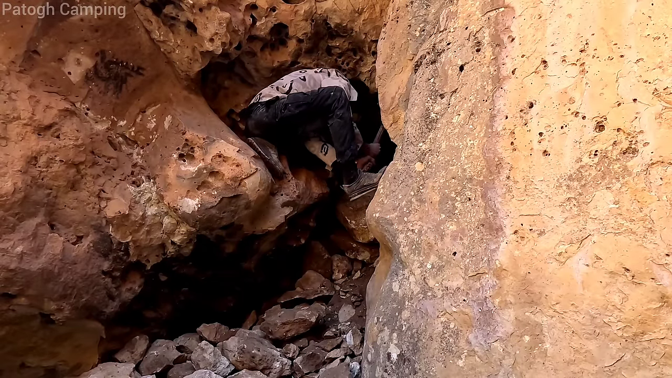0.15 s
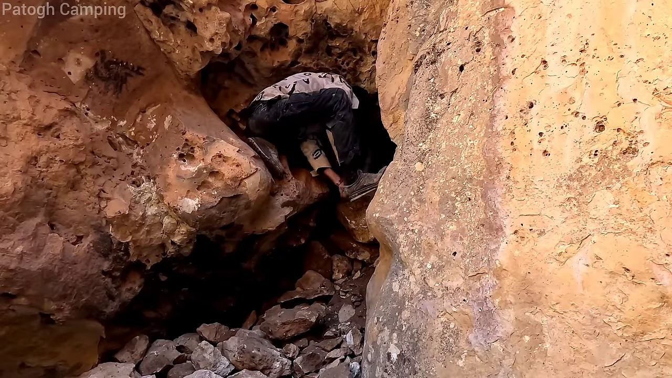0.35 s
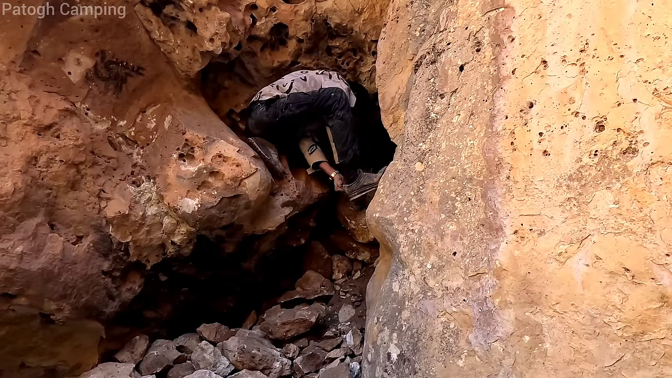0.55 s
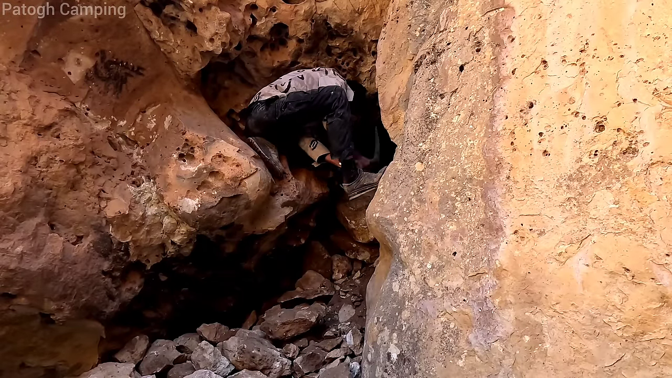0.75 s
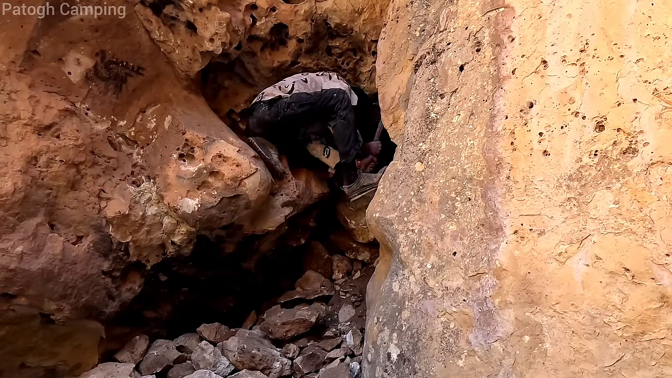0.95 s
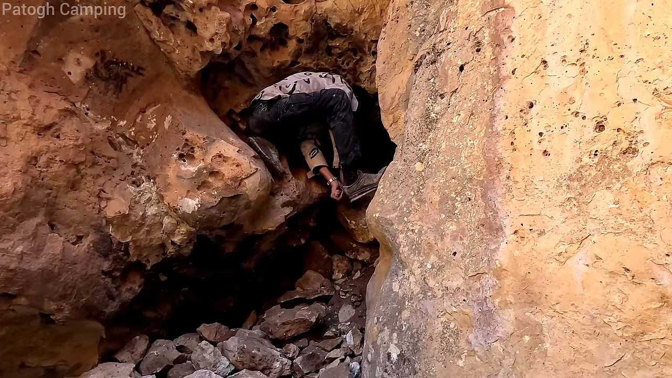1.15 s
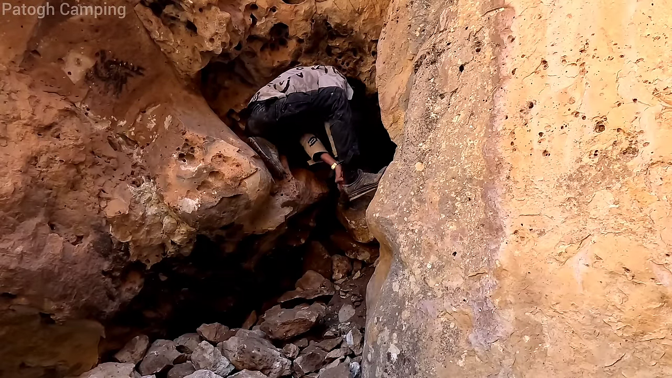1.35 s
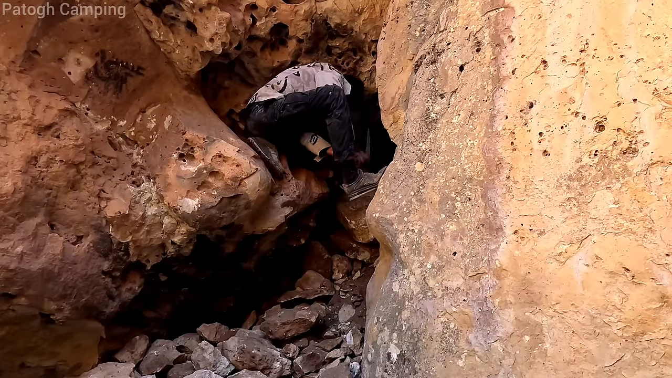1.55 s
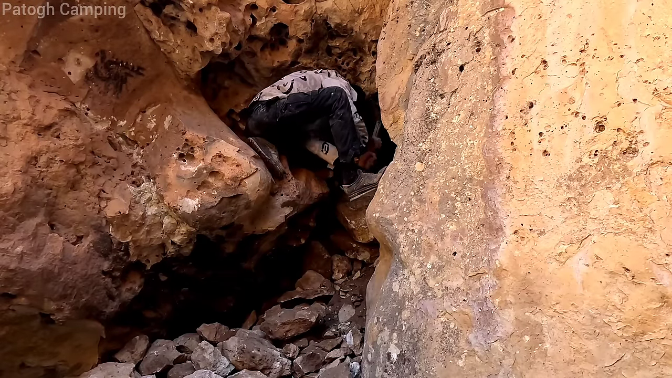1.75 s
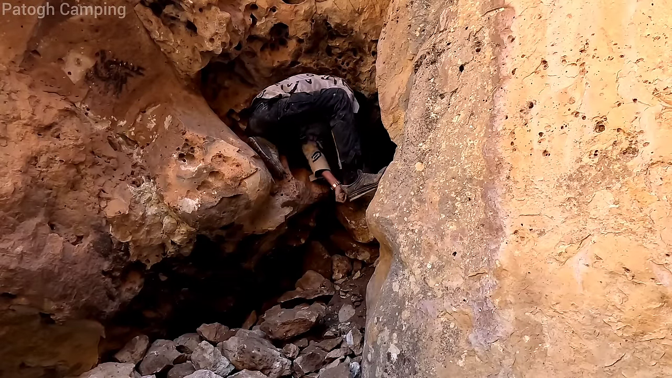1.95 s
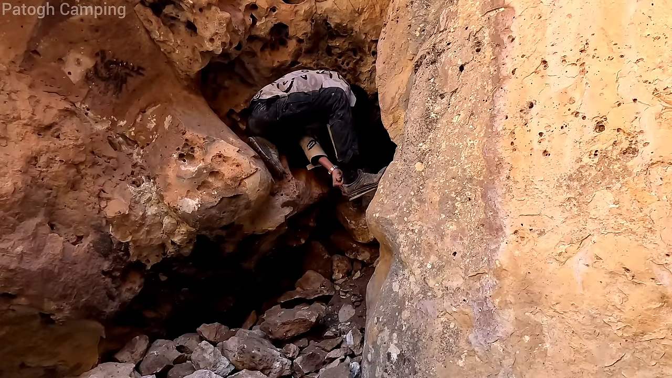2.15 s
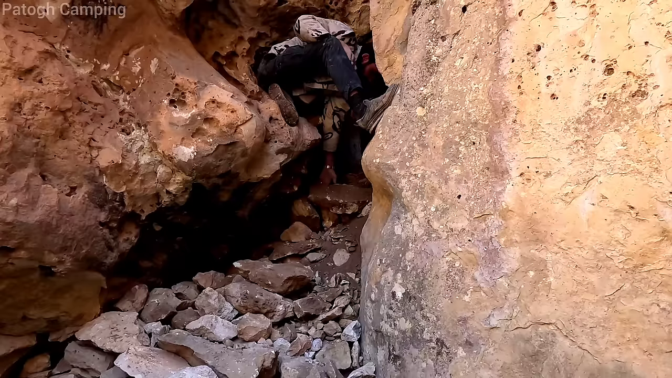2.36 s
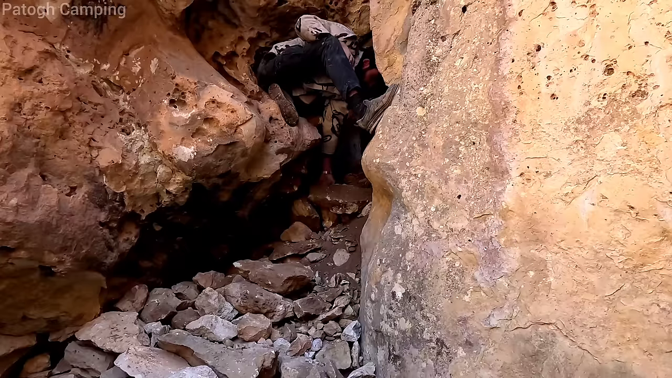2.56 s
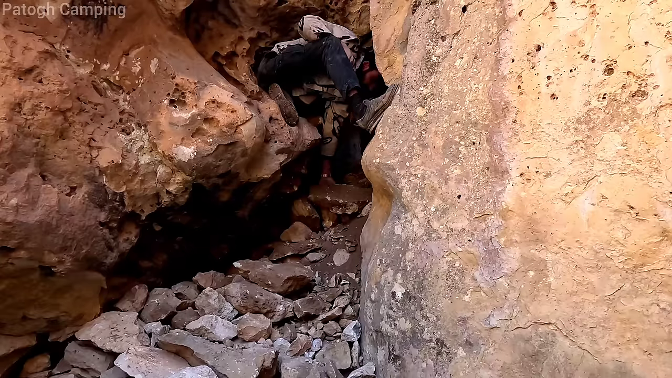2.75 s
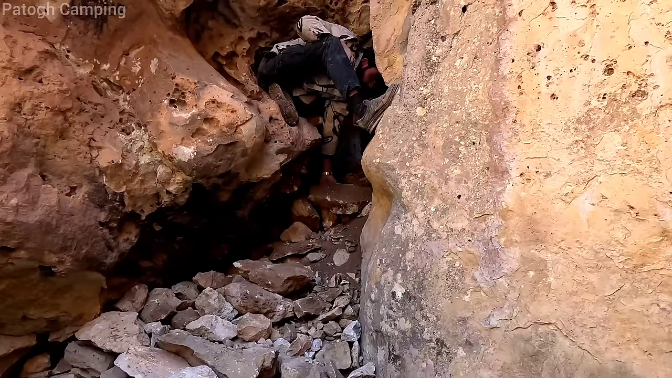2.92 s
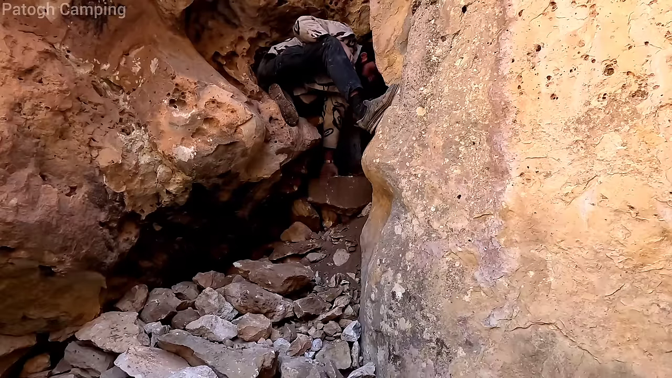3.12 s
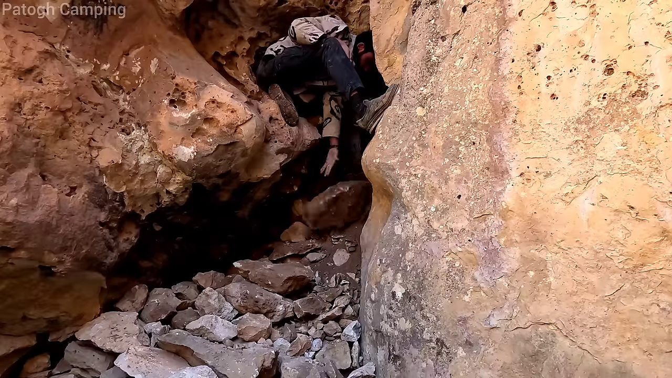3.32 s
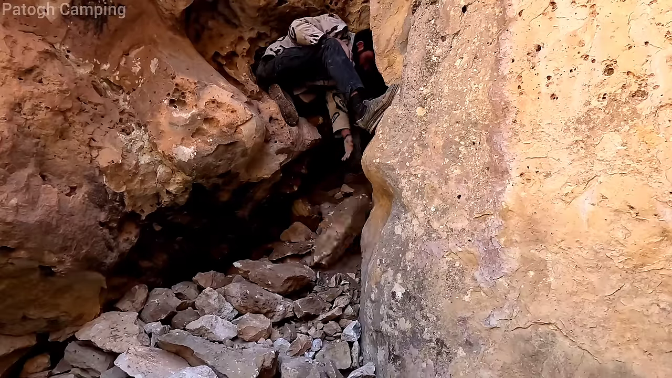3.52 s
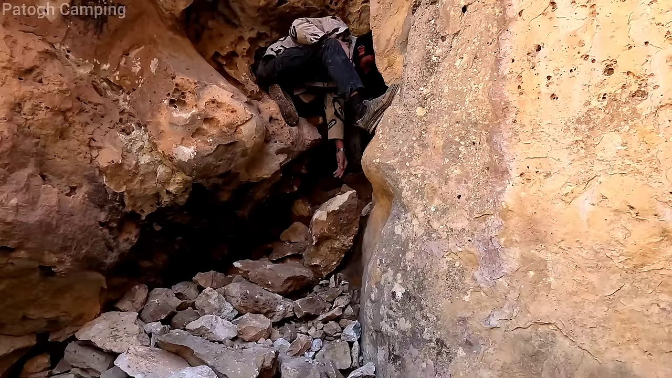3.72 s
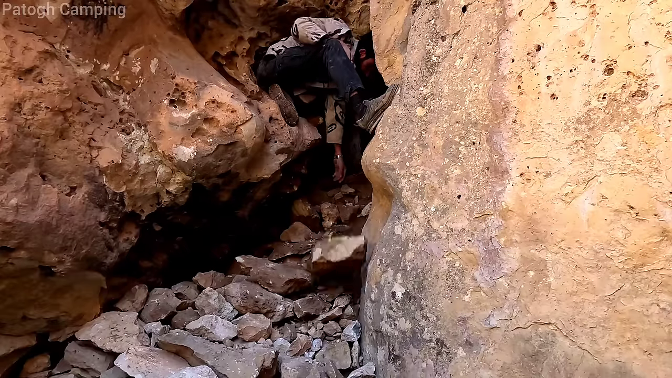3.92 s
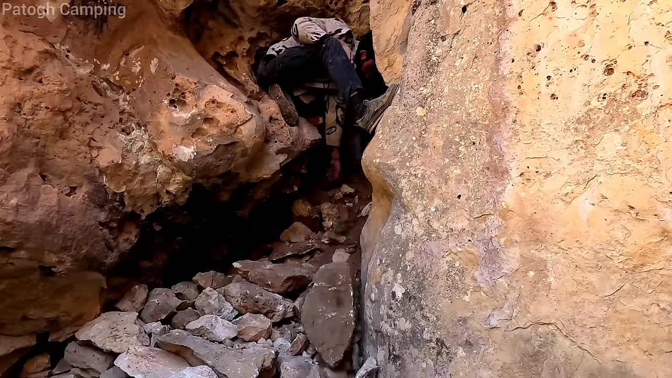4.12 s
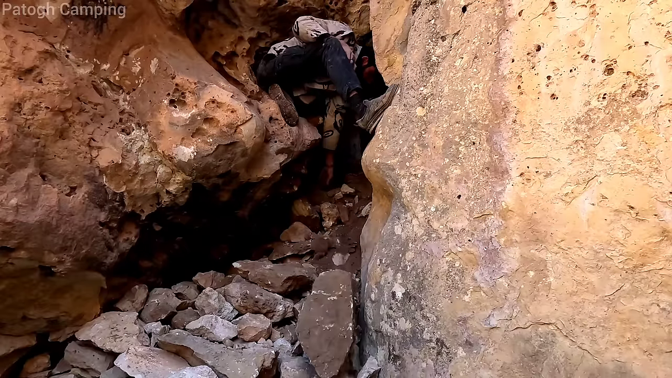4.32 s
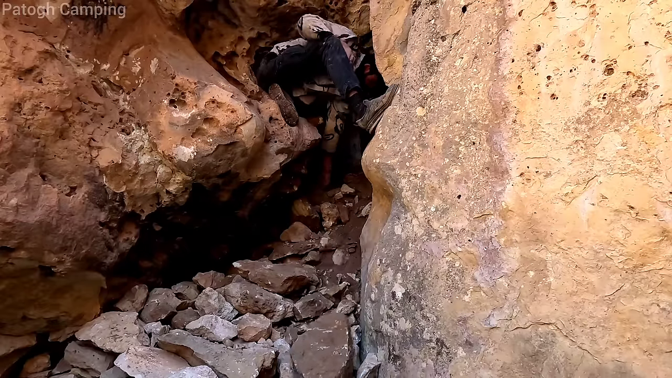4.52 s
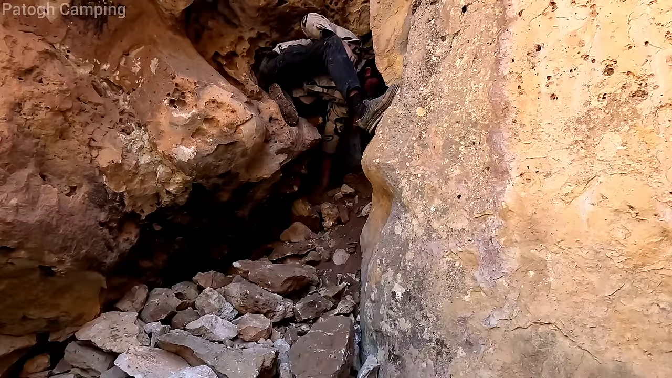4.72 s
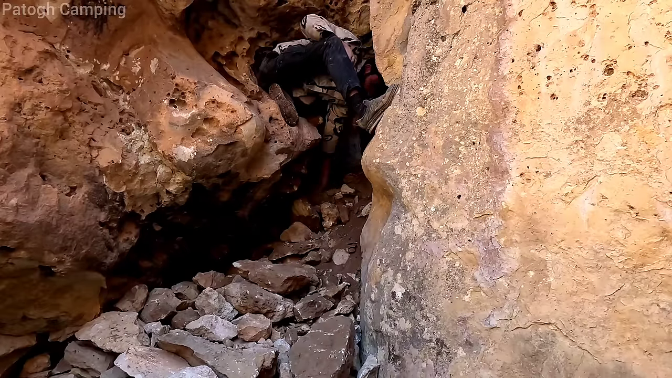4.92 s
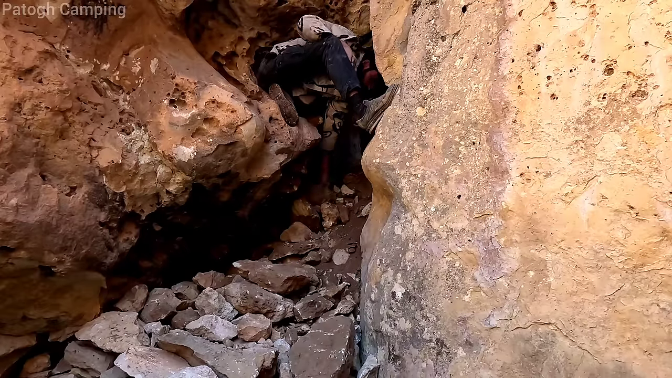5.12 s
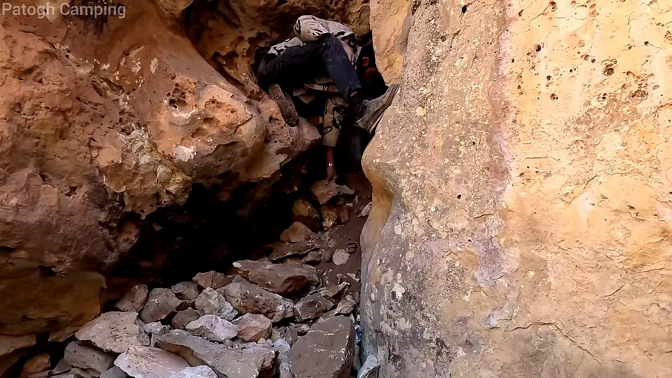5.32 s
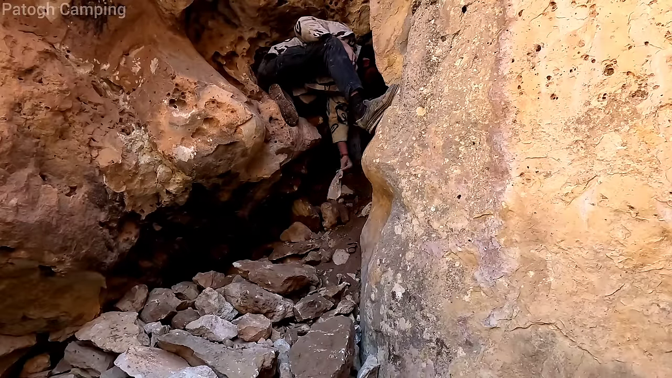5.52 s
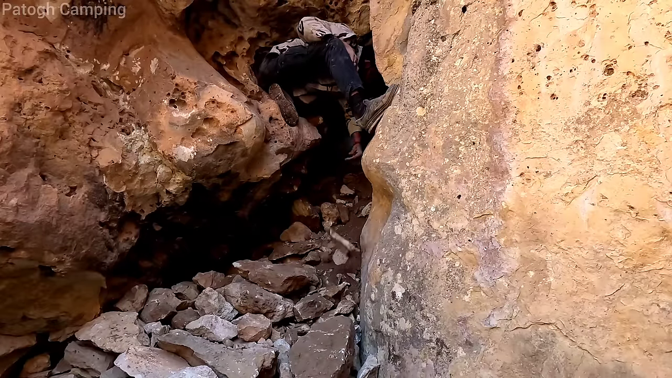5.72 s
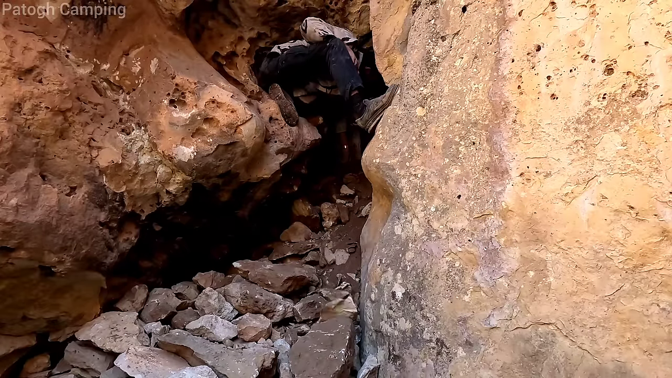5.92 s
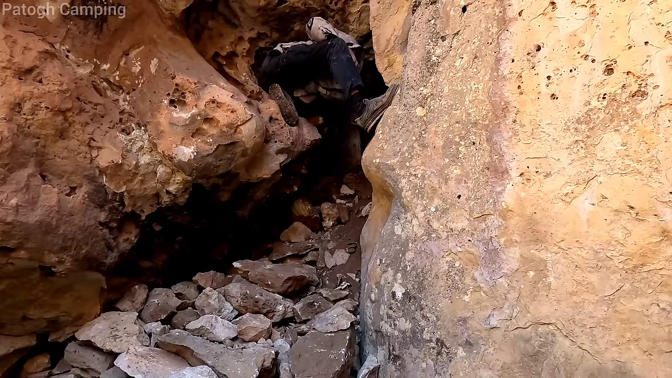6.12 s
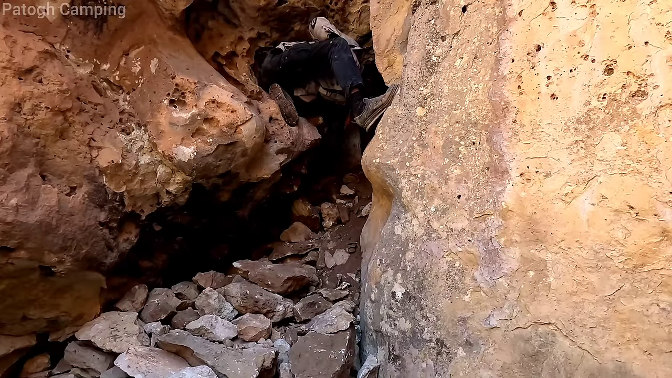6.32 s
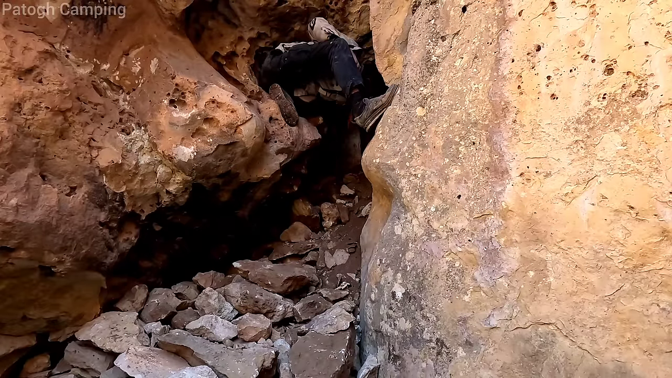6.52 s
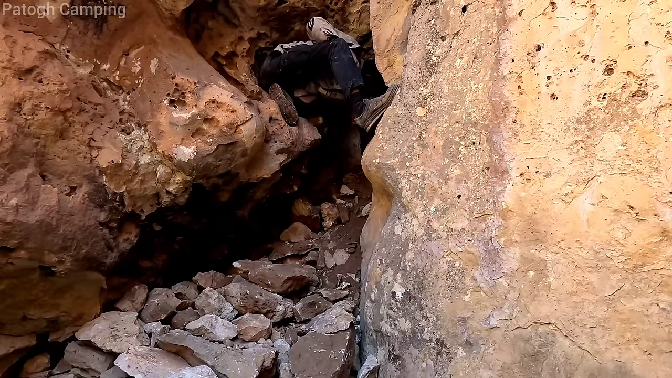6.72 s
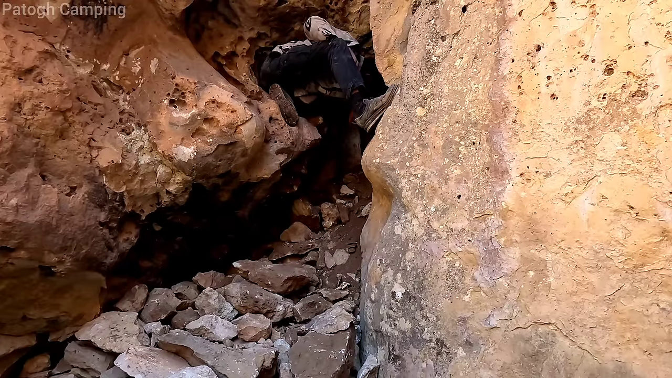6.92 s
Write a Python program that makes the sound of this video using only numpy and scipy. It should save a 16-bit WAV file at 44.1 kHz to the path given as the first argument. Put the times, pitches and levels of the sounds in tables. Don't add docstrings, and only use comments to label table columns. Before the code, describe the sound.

A narrow rock crevice outdoors, heard in stereo with short, dense echoes, faint airy hiss and a low moan of wind. A hammer hits wedged rock at about 0.5 and 1.2 seconds, dry crunching cracks with ringing stone, the second heavier; a softer third at 2.05 leaves a clear steel ring. Tiny grit ticks fall between. At 2.2 the sound dips briefly at a cut. Wind then thumps the microphone, strongest near 3.5. From 3.4 a slab knocks and scrapes loose, then from 4.05 to 4.8 tumbles loudly over rubble, grinding, clacking, with bright chips pinging. Small stones settle and a thin shard chatters around 5.2, with firmer knocks at 5.3 to 5.4. Thrown stones land from 5.7, hardest at 5.87 and 5.91 with a piercing snap, bounce until 6.2, and wobble to rest. Last faint ticks fade into quiet air by 7.

```python
import sys
import numpy as np
from scipy import signal
from scipy.fft import rfft, irfft, next_fast_len
from scipy.io import wavfile

SR = 44100
rng = np.random.default_rng(int(sys.argv[2]) if len(sys.argv) > 2 else 0)


def decibels_to_gain(level_db):
    exponent = np.asarray(level_db, float) / 20
    return 10 ** exponent


def generate_wav(sig):
    pcm = np.round(np.clip(np.atleast_2d(sig).T, -1, 1) * 32767).astype(np.int16)
    wavfile.write(sys.argv[1], SR, pcm)


N = 307377
CHANGE_S, CHANGE_GAP_S = 2.2, 0.022
EDGES = 28 * 2 ** np.arange(0, 9.6, .5)
CENTRES = np.sqrt(EDGES[1:] * EDGES[:-1])
# (frequency [Hz], level [dB per Hz])
STONE_COLOUR = [(59, -38.5), (100, -8.5), (181, -7.5), (403, -12.5), (487, -3), (668, -13), (1090, -5.5),
                (1960, -9.5), (3050, -8.5), (3320, -9), (4190, -14), (7730, -11), (15500, -58.5)]


def at_hz(points, hz):
    table_hz, level_db = np.transpose(points)
    return np.interp(np.log(hz), np.log(table_hz), level_db)


def in_time(rows):
    s, level_db = np.transpose(rows)
    return np.interp(np.arange(N) / SR, s, level_db)


def span(rows):
    s, level_db = np.transpose(rows)
    return decibels_to_gain(np.interp(np.arange(N) / SR, s, level_db, left=-140, right=-140))


def lay(out, sound, s):
    at = round(s * SR)
    out[..., at:at + sound.shape[-1]] += sound


def rms_one(x):
    return x / np.sqrt(np.mean(x ** 2) + 1e-20)


def drift(rate):
    r = np.exp(-80 * np.pi * rate / SR)
    slow = signal.lfilter([1], [1, -2 * r, r * r], rng.standard_normal(N // 40 + 2002))[2000:]
    return np.interp(np.arange(N) / 40, np.arange(len(slow)), rms_one(slow))


def ring(clicks, hz, t60):
    r = decibels_to_gain(-60 / (t60 * SR))
    w = 2 * np.pi * hz / SR
    return signal.lfilter([0, np.sin(w)], [1, -2 * r * np.cos(w), r * r], clicks + 1e-18)


def click_train(seconds, places, heights):
    click = np.zeros(round(seconds * SR))
    click[places] = heights
    return click


def grains(per_s, spread_db):
    sizes = decibels_to_gain(spread_db * np.minimum(rng.exponential(1, N), 5)) * rng.choice([-1, 1], N)
    return rms_one(sizes * (rng.random(N) < per_s / SR))


def bands(mid, side):
    # (frequency [Hz], side minus mid [dB])
    side_db = [(60, -18), (200, -13), (700, -4), (2400, 0.5), (6000, -6.5), (15000, 2)]
    # (frequency [Hz], left minus right [dB])
    lean_db = [(60, -0.5), (4000, 0.5), (8000, 2), (15000, 8)]
    out = np.zeros((len(CENTRES), 2, N))
    for k, hz in enumerate(CENTRES):
        band_pass = signal.butter(2, EDGES[k:k + 2], "band", fs=SR, output="sos")
        m, s = signal.sosfilt(band_pass, [mid[k % 2], side])
        stereo = m + decibels_to_gain(at_hz(side_db, hz) - 2.5) * s * [[1], [-1]]
        out[k] = stereo * decibels_to_gain(at_hz(lean_db, hz) / 2 * np.array([[1], [-1]]))
    return out


def impact(echoes, s, band_db, decay, crack_db):
    # (frequency [Hz], t60 [s])
    crevice = [(40, 0.17), (110, 0.18), (280, 0.26), (740, 0.25), (1940, 0.24), (5120, 0.22), (13500, .13)]
    at = round(s * SR)
    t = np.arange(min(round(decay * SR / np.e), N - at)) / SR
    t60 = at_hz(crevice, CENTRES)[:, None] * decay
    build_up = 1 - np.exp(-t * CENTRES[:, None])
    shape = (decibels_to_gain(-60 * t / t60) + decibels_to_gain(crack_db) * np.exp(-t / 0.0019)) * build_up
    return np.einsum("bt,bct->ct", decibels_to_gain(band_db)[:, None] * shape, echoes[:, :, at:at + len(t)])


def tilt(thud_db, bright_db):
    return np.interp(np.log(CENTRES), np.log([300, 900, 1700, 4200]), [thud_db, 0, 0, bright_db])


def wind(echoes):
    # (time [s], level [dB])
    rumble_curve = [(0, -55), (.43, -64.5), (.72, -43.5), (.97, -60), (1.16, -46), (1.5, -66), (1.65, -55),
                    (2.2, -56), (2.4, -53.5), (2.85, -49), (3.0, -38), (3.5, -33.5), (3.96, -41.5),
                    (4.15, -28.5), (4.66, -31.5), (4.78, -51), (5.6, -61.5), (5.94, -43.5), (6.4, -45),
                    (6.79, -57), (6.97, -77.5)]
    # (time [s], left minus right [dB])
    wind_left = [(2.3, 0), (2.6, -7), (3.2, -6), (3.5, 1)]
    # (time [s], level [dB])
    air_curve = [(0, -68), (2.2, -66.5), (2.3, -63.5), (2.8, -63.5), (2.87, -70.5), (3.06, -72), (3.1, -65),
                 (3.45, -62), (6.7, -64), (6.97, -80)]
    # (frequency [Hz], level [dB per Hz])
    air_colour = [(210, -30), (350, -10.5), (455, -12), (712, -8), (769, -15.5), (911, -15.5), (1450, -7),
                  (2410, -13.5), (7550, -15), (14000, -33.5)]
    # (frequency [Hz], level [dB])
    whistle_tone = (790, -83)
    before_change = np.arange(N) < CHANGE_S * SR

    puff_db = in_time(rumble_curve)
    puff = signal.sosfilt(signal.butter(3, 52, fs=SR, output="sos"), echoes[:4].sum(axis=0))
    sharp_db = np.where(before_change, 0.5, -5 + 0.5 * (puff_db + 40))
    puff = rms_one(puff) + decibels_to_gain(sharp_db) * rms_one(echoes[2:4].sum(axis=0))
    puff = decibels_to_gain(puff_db - 3 + 2.6 * drift(12)) * puff + gusts()
    puff = puff * decibels_to_gain(in_time(wind_left) / 2 * [[1], [-1]])

    moan_db = np.where(before_change, -54.5, np.maximum(grinding() - 3.5, -73))
    moan = np.einsum("b,bct->ct", decibels_to_gain([-12, 14, 6, -15]), echoes[4:8])
    moan = signal.sosfilt(signal.butter(2, [160, 360], "band", fs=SR, output="sos"), moan)
    moan = decibels_to_gain(moan_db + 0.5 * drift(8)) * rms_one(moan)

    hiss = np.zeros((2, N))
    for hz, band in zip(CENTRES[7:], echoes[7:]):
        hiss += decibels_to_gain(at_hz(air_colour, hz) + 2.5 * drift(5)) * band[:, ::-1]
    hiss = span(air_curve) * decibels_to_gain(0.62 * drift(6)) * rms_one(hiss)

    whistle_hz, whistle_db = whistle_tone
    whistle = decibels_to_gain(whistle_db) * rms_one(ring(echoes[9, 0], whistle_hz, .12)) * before_change
    return puff + moan + hiss + whistle


def small_stones():
    # (time [s], peak [dB], bright [dB re peak], body [Hz])
    grit_ticks = [(0.039, -57, 0, 2670), (0.101, -50, -9, 2750), (0.72, -56.5, -0.5, 1980),
                  (0.779, -53, 4.5, 2060), (0.974, -55, 7, 1216), (1.728, -54, 5, 1450),
                  (1.96, -70, 12, 2700), (2.023, -64, 16, 1180), (2.261, -39.5, -34, 785),
                  (2.315, -66.5, 14.5, 2660), (2.415, -67, 11, 2750), (2.504, -55, 0.5, 1400),
                  (3.086, -52, -11.5, 1370), (3.266, -44, -5, 2780)]
    settling = [(4.827, -33.5, -9.5, 2190), (4.892, -44.5, 2.5, 2600), (4.907, -33, -20, 1187),
                (4.983, -39, -2, 2130), (5.096, -35, -10, 3070), (5.157, -42, -3.5, 1740),
                (5.22, -37, -11, 3050), (5.24, -36, -10, 1380), (5.283, -45, 0, 1560),
                (5.314, -20.5, -15.5, 802), (5.399, -17.5, -17, 2806), (5.454, -49.5, 0, 1380),
                (5.507, -49.5, 2.5, 1240)]
    thrown = [(5.669, -23.5, -4.5, 1715), (5.724, -29.5, -14, 1100), (5.78, -13, -24.5, 2527),
              (5.8, -28, -14, 2720), (5.87, -8.5, -4.5, 1020), (5.912, -8, -7, 1090), (5.97, -19, -20, 580),
              (6.014, -23.5, -1.5, 1290), (6.04, -27, -32, 861), (6.059, -17, -35, 930),
              (6.068, -21, -8, 1090), (6.086, -13, -95, 1530), (6.108, -33, -47, 1040),
              (6.176, -55, 10.5, 1270), (6.197, -36, -23.5, 1110), (6.203, -13, -19, 1950),
              (6.215, -13, -26, 1090), (6.297, -43, -24, 1190), (6.352, -34, -54, 1070),
              (6.371, -61.5, 26, 1220), (6.418, -48, -4, 1530), (6.436, -37, -47, 1215),
              (6.487, -45, 2, 1360), (6.532, -62.5, 18.5, 1440), (6.585, -62, 21, 2500),
              (6.753, -57, 10, 1244)]
    contacts = []
    for s, db, bright_db, hz in grit_ticks + settling + thrown:
        thud_db = -9.5 - 14.5 * np.log2(hz / 1000)
        contacts.append((s, db, thud_db, bright_db, hz, -10.5))
    return contacts


def stones(echoes, contacts):
    out = np.zeros((2, N))
    chance = rng.random((len(contacts), 2, 14))
    for (s, db, thud_db, bright_db, hz, body_db), (place, strength) in zip(contacts, chance):
        colour = at_hz(STONE_COLOUR, CENTRES) + db + tilt(thud_db + 11.5, bright_db + 5.5) + 5.5
        colour += 3.9 * np.exp(-(np.log2(CENTRES / hz) / 0.62) ** 2)
        sound = impact(echoes, s, colour, decay=0.64, crack_db=3)
        click = np.zeros(sound.shape[1])
        click[[0, 110, 290]] = decibels_to_gain(db) * decibels_to_gain([0, -4, -7])
        sound += decibels_to_gain(body_db) * (ring(click, hz, .06) + decibels_to_gain(-4) * ring(click, hz * 1.04, .045))
        for lesser_hz, gain in zip(450 * 20 ** place, strength):
            lesser_db = np.interp(np.log(lesser_hz), np.log(CENTRES), colour) - db - 15
            sound += gain * decibels_to_gain(lesser_db) * ring(click, lesser_hz, 0.045)
        lay(out, sound, s)
    return out


def hammer(echoes):
    # (time [s], peak [dB], weight [dB re peak], steel ring [dB])
    blows = [
        (0.481, -8.5, -9.5, -16),
        (1.211, -8.5, -6.5, -12.5),
        (2.054, -14, -2, 1),
    ]
    # (frequency [Hz], level [dB per Hz])
    blow_colour = [(21, -31.5), (35, -8.5), (102, -7.5), (314, -10), (785, -15), (1730, -20), (1970, -18),
                   (3190, -23), (4010, -22.5), (4440, -23), (8850, -31), (15500, -60.5)]
    # (frequency [Hz], level [dB], t60 [s])
    blow_modes = [(58, -1.5, .3), (195, -2.5, 0.2), (312, 2, 0.092), (676, -3, .15), (1915, -13, .22),
                  (1960, -12, .19), (2040, -10, .14), (2350, -14, 0.11), (4064, -7, .19),
                  (4100, -14, 0.073)]
    out, modes = np.zeros((2, N)), np.zeros(N)
    for s, db, thud_db, steel_db in blows:
        bright_db = -7 + 0.86 * thud_db
        colour = at_hz(blow_colour, CENTRES) + db + tilt(thud_db, bright_db + 7.5)
        crunch = impact(echoes, s, colour + tilt(-20.5, 0.1) + 10, decay=0.25, crack_db=-25)
        at = round(s * SR)
        out[:, at - crunch.shape[1]:at] += crunch[:, ::-1]
        for lag_s, level_db in [(0, 18), (.007, 2), (.022, 2)]:
            lay(out, impact(echoes, s + lag_s, colour + level_db, decay=0.98, crack_db=10.5), s + lag_s)
        for hz, mode_db, t60 in blow_modes:
            steel = (steel_db + 11) * (hz > 3000)
            height = decibels_to_gain(db + mode_db - 8.5 + rng.normal(0, 1.5) + steel)
            click = click_train(.5, round(.3 * SR / hz), height)
            lay(modes, ring(click, hz, t60), s)
    return out + modes * decibels_to_gain(4 * drift(70))


def rock():
    # (frequency [Hz], level [dB], t60 [s])
    rock_modes = [(845, -12, .1), (953, -6, .16), (1195, -10, .2), (1330, -8, .14), (1460, -8, .2),
                  (1927, -4, .13), (1952, -5, .22), (2116, -8, .12), (2300, -10, .14), (2440, -11, .17),
                  (2891, -13, .2), (3360, -16, .12), (3820, -16, .14)]
    # (time [s], level [dB], head ring near 2 kHz [dB re rock])
    rock_hits = [
        (0.483, -19, 0),
        (1.213, -18, 0),
        (2.056, -27, 11),
    ]
    out = np.zeros(N)
    click = click_train(.4, [0, 160, 420, 900], [1, .6, .5, .3])
    for s, db, head_db in rock_hits:
        for hz, mode_db, t60 in rock_modes:
            level_db = db + mode_db + rng.normal(0, 2.5) + head_db * (1900 < hz < 1940)
            lay(out, decibels_to_gain(level_db) * ring(click, hz, t60), s)
    return out * decibels_to_gain(3 * drift(60))


def chips():
    # (time [s], level [dB], pitch [Hz])
    chip_hits = [(3.434, -34, 2600), (3.627, -28, 2700), (3.715, -37, 4000), (3.771, -36, 3200),
                 (3.772, -40, 6500), (3.931, -32, 1500), (4.03, -40, 1700), (4.068, -36, 6000),
                 (4.129, -22, 2100), (4.151, -32, 7500), (4.345, -31, 2800), (4.378, -38, 5200),
                 (4.432, -42, 8000), (4.452, -35, 5100), (4.474, -38, 7600), (4.476, -30, 2500),
                 (4.553, -36, 7800), (4.578, -30, 4000), (4.609, -34, 2500), (4.653, -30, 3500),
                 (4.695, -33, 3800), (4.695, -36, 8000), (4.77, -42, 3200), (4.788, -42, 6500),
                 (5.073, -50, 8000), (5.09, -54, 6000), (5.097, -46, 3300), (5.135, -46, 380),
                 (5.185, -54, 8600), (5.305, -54, 6000), (5.401, -34, 2450), (5.401, -36, 5000),
                 (5.458, -56, 9200), (5.668, -32, 4700), (5.763, -52, 9000), (5.781, -24, 2700),
                 (5.8, -40, 4000), (5.871, -30, 7900), (5.912, -16, 2500), (5.913, -22, 4900),
                 (6.013, -32, 5500), (6.014, -30, 1700), (6.068, -35, 5200), (6.18, -50, 8000),
                 (6.371, -46, 10000), (6.488, -56, 4200), (6.533, -52, 5500), (2.228, -58, 400),
                 (1.198, -36, 2000), (3.09, -56, 2700), (0.482, -15, 1950), (1.212, -20, 1850),
                 (2.055, -18, 2000), (0.482, -21, 2700), (0.482, -25, 3400), (1.212, -24, 3300),
                 (1.212, -28, 5200), (4.108, -26, 750), (4.45, -32, 3700), (4.536, -33, 3600)]
    spread, cycles = .07, 90
    out = np.zeros(N)
    click = click_train(.1, [0, 40, 130], [1, .6, .4])
    for s, db, hz in chip_hits:
        for off, stretch in rng.standard_normal((5, 2)):
            t60 = min(cycles / hz, .06) * np.exp(stretch / 3)
            lay(out, decibels_to_gain(db - 6) * ring(click, hz * np.exp(spread * off), t60), s)
    return out


def gusts():
    # (time [s], peak [dB], frequency [Hz])
    slaps = [(2.33, -38.5, 35.5), (2.454, -32, 42.8), (2.598, -34, 29.7), (2.669, -29, 51.2),
             (2.716, -33.5, 50), (2.774, -37.5, 88), (2.896, -35.5, 30.16), (2.954, -35, 62),
             (2.989, -37, 109), (3.052, -25.5, 76.5), (3.139, -38.5, 79.4), (3.187, -34, 72),
             (3.224, -26.5, 45.3), (3.3, -32.5, 58.6), (3.35, -25, 53.7), (3.409, -21.5, 118),
             (3.485, -17.5, 55.7), (3.511, -18.5, 40)]
    out = np.zeros(N)
    for s, db, hz in slaps:
        turns = np.arange(-2 * SR // hz, 2 * SR // hz) * hz / SR
        slap = decibels_to_gain(db - 2) * np.exp(-(turns / .5) ** 2) * np.sin(2 * np.pi * turns)
        out[round(s * SR) - len(turns) // 2:][:len(turns)] += slap
    return out


def grinding():
    # (time [s], level [dB])
    slide_curve = [(3.07, -84), (3.38, -61), (3.42, -72), (3.45, -51), (3.6, -51), (3.95, -53), (4.25, -28),
                   (4.37, -37.5), (4.62, -32.5), (4.85, -55.5), (5.55, -70)]
    # (time [s], level [dB])
    scatter_curve = [(5.55, -81), (6.0, -43.5), (6.16, -64.5), (6.45, -59), (6.7, -90)]
    s, level_db = np.transpose(slide_curve + scatter_curve[1:])
    return np.interp(np.arange(N) / SR, s, level_db, left=-140, right=-140)


def rubble():
    def contact():
        return grains(900 * decibels_to_gain(3.3 * drift(41)), 4.3) + 0.6 * rng.standard_normal(N)

    grind_gain = decibels_to_gain(grinding())
    grit_gain = decibels_to_gain(-46.5) * (100 * grind_gain) ** 0.6
    parts = bands([contact(), contact()], contact()) * decibels_to_gain(at_hz(STONE_COLOUR, CENTRES))[:, None, None]
    pebbles, dealt = grains(250, 3.5), rng.integers(0, 24, N)
    rings = []
    for k, hz in enumerate(np.geomspace(500, 9000, 24)):
        rings.append(decibels_to_gain(at_hz(STONE_COLOUR, hz)) * ring(pebbles * (dealt == k), hz, .04))
    low = parts[(CENTRES > 380) & (CENTRES < 3000)].sum(axis=0)
    high = parts[CENTRES > 3000].sum(axis=0)
    grind = rms_one(low) + decibels_to_gain(-7) * rms_one(sum(rings[:15]))
    grit = rms_one(high) + decibels_to_gain(-5) * rms_one(sum(rings[15:]))
    return grind_gain * decibels_to_gain(2.5 * drift(12)) * grind + grit_gain * decibels_to_gain(2 * drift(14)) * grit


def slab():
    # (time [s], peak [dB], thud [dB re peak], bright [dB re peak])
    topple = [(3.434, -30, -40, -15), (3.449, -14, -52, -17), (3.464, -19, 0, -17), (3.484, -20, 6, -8.5),
              (3.529, -37, 10, -1), (3.555, -26, -22, -17), (3.574, -26, -16, -13), (3.618, -26.5, 7, -6),
              (3.627, -21, 12, -10), (3.707, -26.5, -41, -4), (3.747, -27, -3, -6.5), (3.771, -24, -4, -4),
              (3.806, -22, -1.5, -15.5), (3.847, -35, -4, -7.5), (3.931, -21.5, -49, -26),
              (3.972, -54, -20, 10), (4.049, -36.5, -2, 2)]
    tumble = [(4.067, -18.5, 13, -5.5), (4.111, -14, -10, -10), (4.129, -7, -6.5, -14),
              (4.151, -5, -4.5, -12), (4.189, -16, -36, -32.5), (4.23, -22.5, -17, -17.5),
              (4.274, -17.5, 7, -26), (4.296, -20.5, -1, -3.5), (4.389, -12.5, 2, -32),
              (4.448, -13.5, -32, -20), (4.474, -16, 4.5, -10), (4.535, -16, 2, -12),
              (4.553, -13, -2.5, -9.5), (4.576, -12, -3.5, -17), (4.587, -22, -20, -30),
              (4.609, -13, -29, -27), (4.653, -10, -25, -21.5), (4.695, -19.5, -30, -4.5),
              (4.715, -24, -6, -18), (4.768, -35, 0.5, -2), (4.786, -35.5, 1, -3)]
    rows = topple + tumble
    pitches = 1090 * np.exp(0.1 * rng.standard_normal(len(rows)))
    return [(*row, hz, -23.5) for row, hz in zip(rows, pitches)]


def flakes():
    # (time [s], level [dB], pitch [Hz])
    clear_pings = [(3.53, -34.5, 4860), (3.749, -36.5, 5850), (3.748, -38.5, 7560), (3.944, -48, 7580),
                   (3.974, -42, 5850), (4.109, -35.5, 4100), (4.192, -46, 7300), (4.222, -30.5, 5410),
                   (4.248, -35.5, 5400), (4.298, -38, 7730), (4.541, -32.5, 3860), (4.683, -33.5, 5390),
                   (5.73, -46.5, 9150), (5.78, -47, 9300), (6.214, -28, 1190), (3.868, -50, 5850),
                   (4.31, -44, 5900), (5.316, -27, 3317), (5.317, -40, 5280), (6.214, -38, 5220),
                   (4.589, -17.5, 1128), (4.535, -30, 604), (4.17, -42, 5500), (4.26, -44, 6900),
                   (4.62, -44, 6900), (4.67, -30, 1000), (4.815, -52, 9200), (3.975, -46, 7850),
                   (5.873, -32, 5040), (5.872, -36, 3250), (5.915, -32, 5800), (5.914, -28, 3284),
                   (6.015, -38, 5141), (6.015, -38, 5905), (6.016, -40, 3300), (6.07, -42, 5200),
                   (5.783, -32, 2700), (5.16, -52, 5280), (5.184, -50, 5280), (5.24, -54, 6500),
                   (5.288, -54, 6500), (5.52, -60, 5350)]
    # (frequency [Hz], level [dB], t60 [s])
    plate_modes = [(3340, -1, .13), (5220, -10, .1), (5950, -10, .12), (7700, -12, .06)]
    # (time [s], level [dB])
    plate_hits = [
        (5.871, -20),
        (5.911, -22.5),
        (6.012, -36),
        (6.069, -42),
    ]
    # (time [s], peak [dB])
    snaps = [
        (4.154, -11),
        (4.474, -21),
        (5.784, -33.5),
        (5.912, 2.5),
    ]
    out = np.zeros(N)
    click = click_train(.25, [0, 70, 210, 440], [.7, .6, .6, .5])
    pings = [(s, db, hz, 0.079 * (hz / 5000) ** -0.4) for s, db, hz in clear_pings]
    for s, db in plate_hits:
        for hz, mode_db, t60 in plate_modes:
            pings.append((s, db + mode_db + rng.normal(0, 1), hz, t60))
    for s, db, hz, t60 in pings:
        pair = ring(click, hz, t60) + ring(click, hz * 1.012, t60 * 0.5)
        lay(out, decibels_to_gain(db + 3.5) * pair, s)
    out *= decibels_to_gain(2.5 * drift(100))
    tap = click_train(.25, 0, .7)
    pulse = sum(ring(tap, hz, 7 / hz) for hz in (2600, 4300, 6800)) / 2
    for s, db in snaps:
        lay(out, decibels_to_gain(db + 1.5) * pulse, s)
    return out


def shard():
    # (time [s], level [dB])
    rocking = [(4.97, -67.5), (5.21, -52), (5.3, -57)]
    # (frequency [Hz], level [dB], t60 [s])
    shard_modes = [(3290, 7, 0.064), (3430, 4.5, .06), (5280, -7.5, .07), (6500, -5, 0.072),
                   (7770, -15.5, .05)]
    # (time [s], level [dB])
    wobble = [(6.22, -42), (6.33, -59), (6.5, -69.5)]
    taps = grains(670, 2.6) * decibels_to_gain(-24.5)
    out = decibels_to_gain(13) * ring(taps * span(wobble), 1215, 0.046)
    for hz, db, t60 in shard_modes:
        out += decibels_to_gain(db) * ring(taps * span(rocking), hz, t60)
    return out


def scene():
    white = rng.standard_normal((3, N))
    echoes = bands(white[:2], white[2])
    t = np.arange(N) / SR
    mix = wind(echoes) + stones(echoes, slab() + small_stones())
    mix += (hammer(echoes) + rock()) * (t < CHANGE_S)
    mix += chips() + rubble() + flakes() + shard()
    dip_s = [-.004, 0, CHANGE_GAP_S - .006, CHANGE_GAP_S]
    return mix * np.interp(t - CHANGE_S, dip_s, [0.96, 0.053, 0.036, 0.92])


def roll_off(x):
    return signal.sosfilt(signal.butter(12, 15680, fs=SR, output="sos"), x)


def record(dry):
    # (frequency [Hz], level [dB])
    microphone = [(20, 0.5), (6500, -1.5), (8300, 1.5), (10000, -8.5), (13000, -4), (15500, -18.5),
                  (15700, -61.5)]
    left_lag = .6
    size = next_fast_len(N)
    hz = np.arange(size // 2 + 1) * SR / size
    lag = np.exp(-2j * np.pi * hz / SR * [[left_lag], [0]])
    colour = decibels_to_gain(at_hz(microphone, np.maximum(hz, 1))) * lag
    heard = irfft(rfft(dry, size) * colour, size)[:, :N]
    return roll_off(1.115 * np.tanh(heard / 1.423))


dry = scene()
out = record(dry)
generate_wav(out)
```